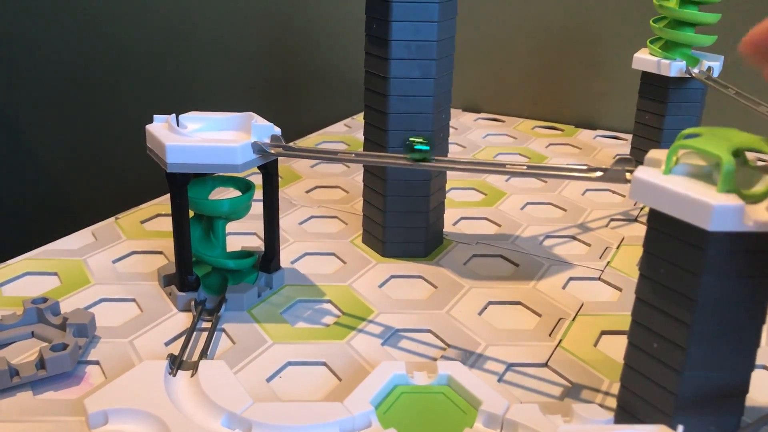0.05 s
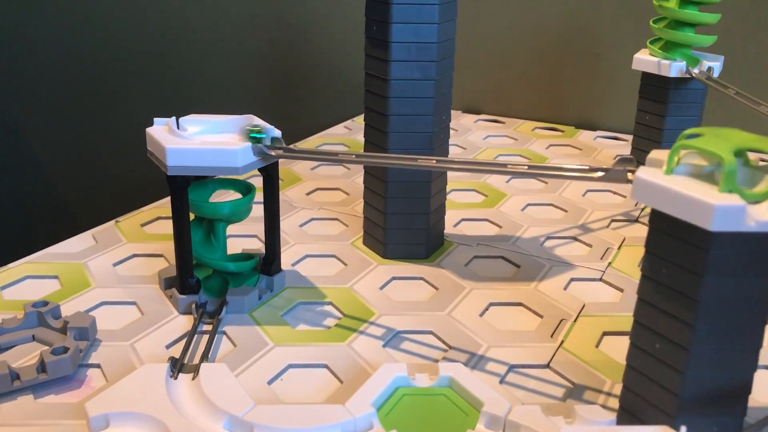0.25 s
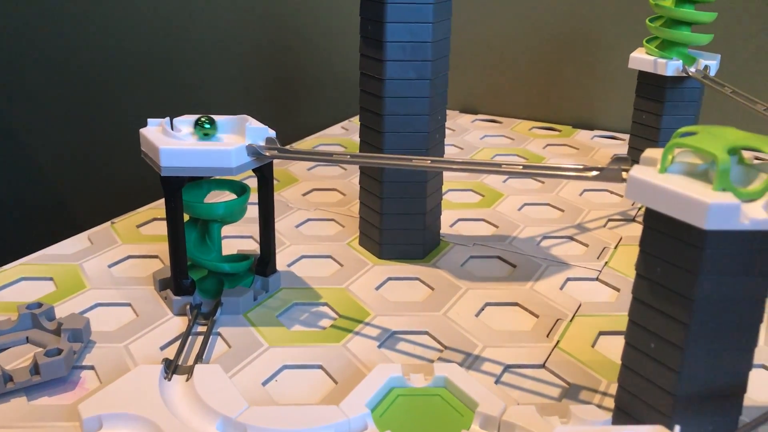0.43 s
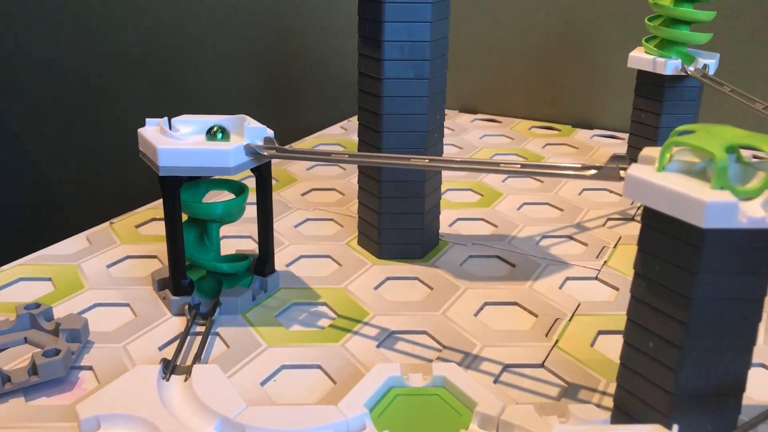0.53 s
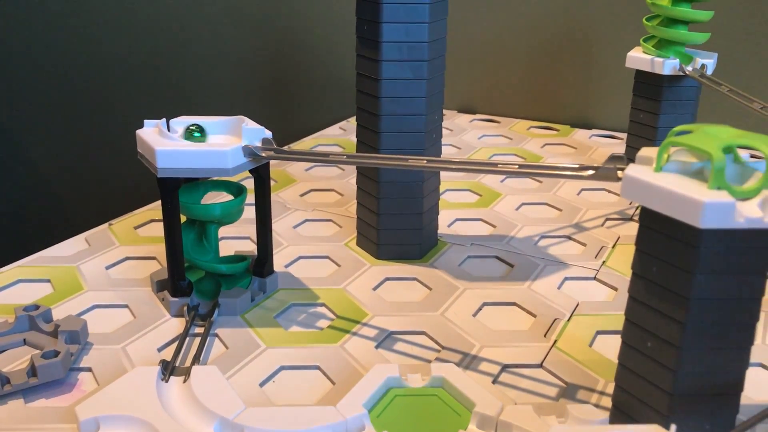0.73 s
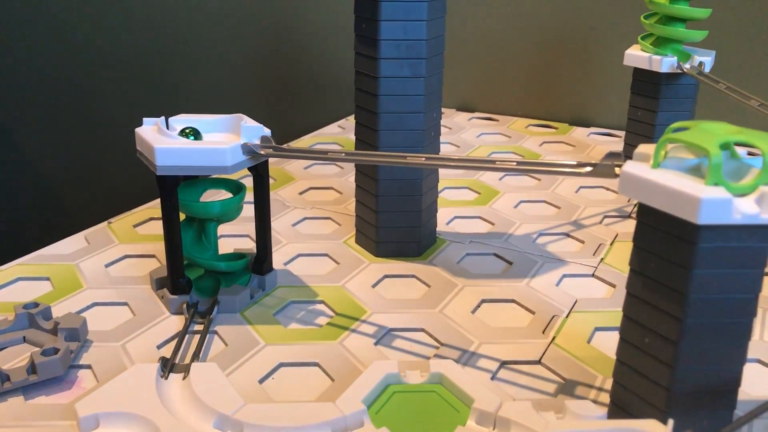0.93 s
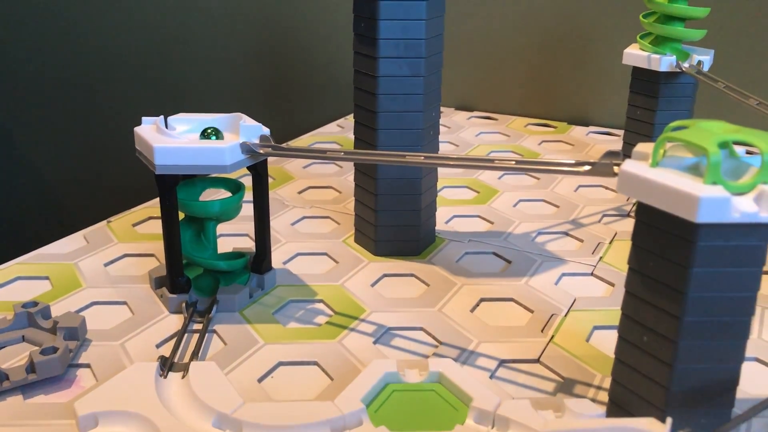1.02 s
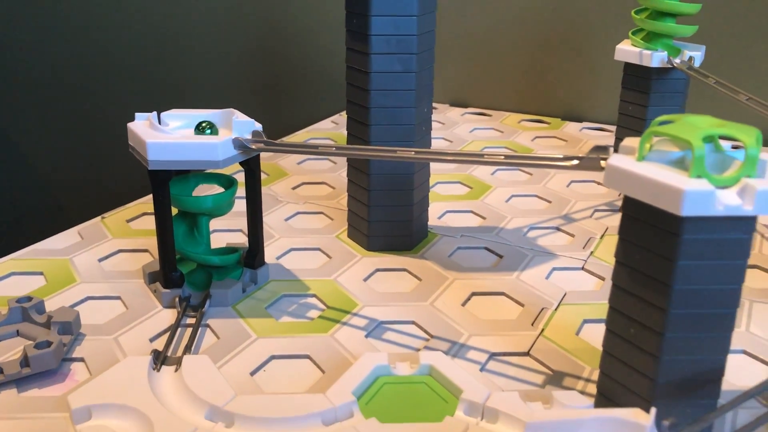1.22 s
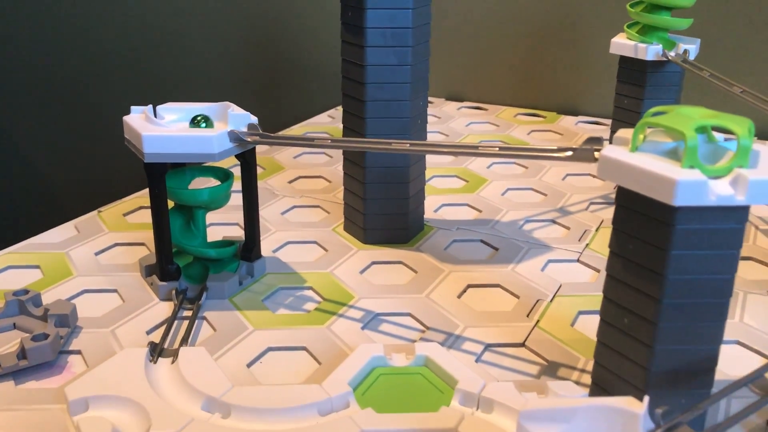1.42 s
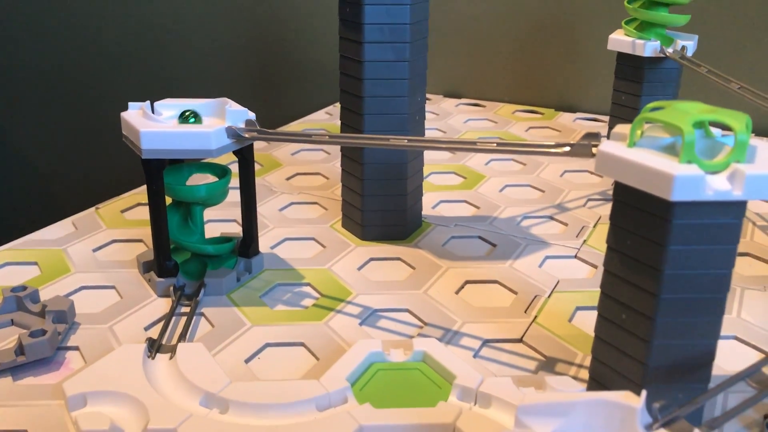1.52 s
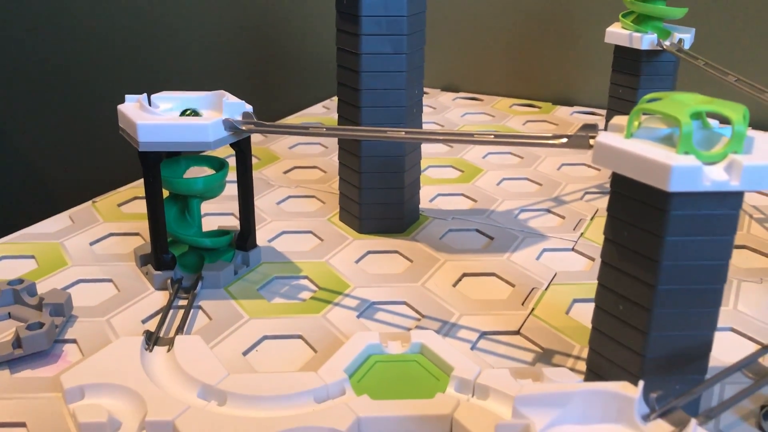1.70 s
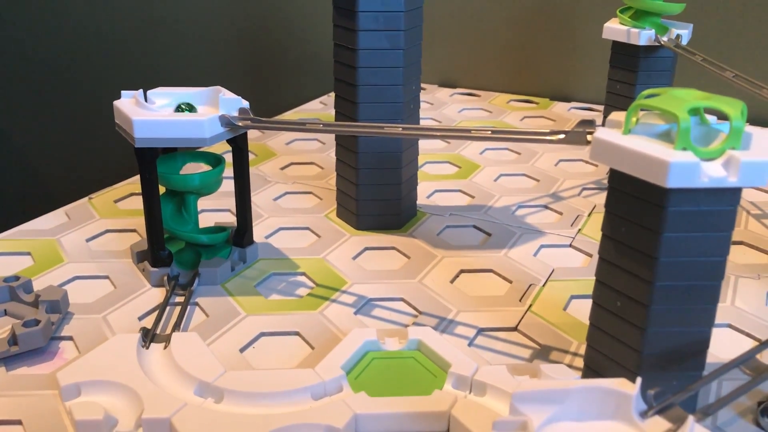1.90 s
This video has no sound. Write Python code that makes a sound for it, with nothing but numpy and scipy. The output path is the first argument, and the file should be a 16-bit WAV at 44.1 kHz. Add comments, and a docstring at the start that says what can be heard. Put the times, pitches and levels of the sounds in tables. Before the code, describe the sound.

A marble rolls along metal rails on a toy marble run, with one dry tap near 0.1 seconds. From 0.2 to 0.5 seconds it clatters into a plastic tray in sharp, glassy knocks while the rails ring. From 0.6 to 2 seconds it circles the dish much more softly, in quickening swells of hollow rumble with brief scrapes. The quiet room has a faint electrical hum.

```python
"""In a quiet room with a faint mains hum, a marble rolls down a pair of metal rails and sets them ringing.
After one dry tap it clatters into the plastic tray of a toy marble run: each knock cracks and rings
the shell with a glassy ping on top, and two landings thud on the tray's floor. The marble then swings
round the dish, each swing sooner than the last, rumbling on the slope, stirring a hollow ring from
the tray and scraping where it is fastest."""
import sys
import numpy as np
from scipy import signal
from scipy.io import wavfile

SR = 44100
rng = np.random.default_rng(int(sys.argv[2]) if len(sys.argv) > 2 else 0)


def store_pcm(level_fs):
    """Save levels as 16-bit WAV."""
    pcm = np.round(np.clip(level_fs, -1, 1) * 32767).astype(np.int16)
    wavfile.write(sys.argv[1], SR, np.atleast_2d(pcm).T)


N = 85995


def amp(db):
    """Decibels to gain."""
    return 10 ** (np.asarray(db) / 20)


def unit(x):
    """Scales to rms 1."""
    return x / np.sqrt(np.mean(x ** 2) + 1e-20)


def curve_at(points, hz):
    """Reads a curve on a log-frequency axis."""
    f, value = np.transpose(points)
    return np.interp(np.log(hz + 1), np.log(f + 1), value)


def fader(points):
    """Gain over time from (time_s, level_db) points, shut after the last."""
    return amp(np.interp(np.arange(N) / SR, *np.transpose(points), right=-140))


def decay(t, t60):
    """Falls 60 dB in t60 seconds."""
    return np.exp(-np.log(1000) * t / t60)


def add(mix, start_s, sound):
    """Mixes a sound in at start_s."""
    part = mix[max(round(start_s * SR), 0):][:len(sound)]
    part += sound[:len(part)]


def body(eq, peaks=(), size=4096):
    """Minimum-phase impulse response of an EQ curve with resonant peaks."""
    hz = abs(np.fft.fftfreq(size, 1 / SR))
    gain = amp(curve_at(eq, hz))
    for pitch_hz, width_hz, db in peaks:
        gain *= 1 + (amp(db) - 1) / (1 + (2 * (hz - pitch_hz) / width_hz) ** 2)
    spectrum = np.exp(np.conj(signal.hilbert(np.log(gain))))
    return np.fft.ifft(spectrum).real[:size // 2]


def colour(x, eq, peaks=()):
    """Passes a sound through a body."""
    return signal.fftconvolve(x, body(eq, peaks))[:len(x)]


def noise(eq, peaks=(), size=N):
    """Coloured noise of rms 1."""
    return unit(colour(rng.standard_normal(size), eq, peaks))


def resonate(x, pitch_hz, width_hz):
    """Rings one narrow resonance, scaled to rms 1."""
    return unit(signal.lfilter(*signal.iirpeak(pitch_hz, pitch_hz / width_hz, SR), x))


def grit(per_s=6100, spread_db=3.5):
    """Tiny impacts of the marble on the grain of the surface."""
    sizes = amp(spread_db * np.minimum(rng.exponential(1, N), 4))
    return sizes * rng.choice([-1, 1], N) * (rng.random(N) < per_s / SR)


# Dark bed of room air: freq_hz, gain_db
AIR_EQ = [(20, -18), (40, -2.5), (58, 1.5), (170, -10.5), (400, -10), (2000, -30.5), (9000, -32.5)]
# Mains hum and its octave: pitch_hz, level_db
HUM_TONES = [(60, -76), (120, -73)]

def room_tone(air_db=-69.5):
    """Steady room air and mains hum lie under everything."""
    t = np.arange(N) / SR
    air = amp(air_db) * noise(AIR_EQ)
    hum = sum(amp(db) * np.sqrt(2) * np.sin(2 * np.pi * (hz * t + rng.random())) for hz, db in HUM_TONES)
    return air + hum


# Fader rides for the roll on the rails and for their ring: time_s, level_db
RAIL_ROLL_FADER = [(0, -62), (.18, -56), (.24, -53.5), (.3, -67)]
RAIL_RING_FADER = [(.22, -72), (.28, -40.5), (.47, -45.5), (.53, -57), (.6, -70.5), (.8, -104)]
# Tone of the bassy roll and of the bright ring: freq_hz, gain_db
RAIL_ROLL_EQ = [(30, -13), (90, 3.5), (350, -16), (1150, -6), (1700, -3.5), (2100, -13), (3600, -11.5),
                (8000, -24), (16000, -35.5)]
RAIL_RING_EQ = [(300, -22.5), (1100, -5), (2100, -12), (2650, 0.5), (2950, 1), (3300, -14.5), (7000, -15),
                (9000, -30)]
# Metallic resonances in the ring: pitch_hz, width_hz, boost_db
RAIL_RING_PEAKS = [(2375, 40, 9), (2625, 25, 9)]

def rails():
    """The marble jolts along the rails, which ring on after it has left them."""
    roll = unit(colour(grit(per_s=1100), RAIL_ROLL_EQ))
    ring = noise(RAIL_RING_EQ, RAIL_RING_PEAKS)
    return fader(RAIL_ROLL_FADER) * roll + fader(RAIL_RING_FADER) * ring


# Clicky midrange of the tap: freq_hz, gain_db
TAP_EQ = [(100, -15.5), (800, 4), (1700, 6.5), (2700, -17.5), (3800, 6.5), (5000, -22), (16000, -31.5)]

def tap(start_s=.1272, level_db=-32):
    """One dry tap sounds before the marble reaches the tray."""
    out, t = np.zeros(N), np.arange(SR // 2) / SR
    add(out, start_s, amp(level_db) * noise(TAP_EQ, size=len(t)) * decay(t, t60=.018))
    return out


# Ring of the struck tray: pitch_hz, level_db, t60_s
TRAY_MODES = [(1060, -16, .06), (1157, -14, .09), (1650, -14, .06), (1769, -17, .1), (2043, -17, .12),
              (2187, -17, .13), (2368, -5, .08), (2417, -13, .13), (2625, -22, .27), (4090, -12, .03),
              (4483, -4, .035), (4736, -5, .035), (6200, -5, .035)]
# Bright crack of the shell and low shudder of the base: freq_hz, gain_db
CRACK_EQ = [(300, -27), (700, -9.5), (1200, -4.5), (2200, 0), (3200, -8), (4500, -6), (5200, -9.5),
            (7000, -8), (7700, -15.5), (8700, -12), (12500, -16.5), (15500, -26)]
SHUDDER_EQ = [(25, -20.5), (75, 3), (230, 0), (2000, -77.5)]
# Centres of each knock's low, middle, presence, edge and top bands: freq_hz
KNOCK_BANDS_HZ = (1050, 2200, 4600, 6300, 10000)
# Hits on the plastic, with EQ and ping relative to each hit's level:
# start_s, level_db, low_db, presence_db, edge_db, top_db, ping_db
KNOCK_CUES = [(0.1706, -52.5, 6, 2.5, 4, 2.5, -28), (0.224, -43, 2.5, 0, 4, 12, 3),
              (0.2289, -37.5, -2.5, 2, 7, 14, 7), (0.251, -38.5, 5, -1, 7, 10.5, 2.5),
              (0.2665, -31, -5.5, -5, 0.5, -0.5, -11.5), (.273, -19.5, -5, -1, -5.5, -4.5, -11),
              (0.302, -22.5, 1.5, -9, -4, -5, -21), (0.3501, -18, -7, -3.5, -3.5, -3.5, -29),
              (0.3739, -28, 1, -9, 1, -5, -8), (.408, -30.5, -2.5, -4, -3.5, 2, -4.5),
              (0.4465, -25, -8, -4.5, -2.5, -4.5, -16), (.452, -34, 4, -10, -7, -2, 1)]

def knocks(crack_db=-3.5, snap_db=5, shudder_db=-38.5, rise_cycles=.28):
    """Each knock snaps, cracks the shell, rings the tray's modes and shakes the base."""
    out, t = np.zeros(N), np.arange(SR // 2) / SR
    ring = np.zeros(len(t))
    for k, (hz, db, t60) in enumerate(TRAY_MODES):
        attack = 1 - np.exp(-t * hz / rise_cycles)
        ring += (-1) ** k * amp(db) * attack * decay(t, t60) * np.sin(2 * np.pi * hz * t)
    hardest_db = max(cue[1] for cue in KNOCK_CUES)
    for start_s, db, low_db, presence_db, edge_db, top_db, _ in KNOCK_CUES:
        snap = amp(snap_db + db - hardest_db) * decay(t, t60=.0045)  # harder hits are snappier
        crack = noise(CRACK_EQ, size=len(t)) * (amp(crack_db) * decay(t, t60=.068) + snap)
        eq = list(zip(KNOCK_BANDS_HZ, (low_db, 0, presence_db, edge_db, top_db)))
        clack = colour(crack + ring, eq)
        shudder = amp(shudder_db) * noise(SHUDDER_EQ, size=len(t)) * decay(t, t60=.49)
        add(out, start_s, amp(db) * (clack + shudder))
    return out


def pings(pitch_hz=11280, rise_s=.0015):
    """A brief glassy ping rides on each knock."""
    out, t = np.zeros(N), np.arange(SR // 2) / SR
    envelope = (1 - np.exp(-t / rise_s)) * decay(t, t60=.036)
    ping = envelope * np.sin(2 * np.pi * pitch_hz * t)
    for start_s, db, *_, ping_db in KNOCK_CUES:
        add(out, start_s, amp(db + ping_db) * ping)
    return out


# Landings on the floor of the tray: start_s, peak_db, pitch_hz
THUD_CUES = [(0.3505, -23.5, 1057), (0.411, -31.5, 1134)]

def thuds(rise_s=.03):
    """The floor of the tray answers a landing with a short hollow note."""
    out, t = np.zeros(N), np.arange(SR // 2) / SR
    envelope = (1 - np.exp(-t / rise_s)) ** 2 * decay(t, t60=.03)
    envelope /= envelope.max()
    for start_s, db, hz in THUD_CUES:
        add(out, start_s, amp(db) * envelope * np.sin(2 * np.pi * hz * t))
    return out


# Tone of the marble rolling on plastic: freq_hz, gain_db
RUMBLE_EQ = [(100, -11.5), (380, -22), (600, -2), (740, -10.5), (950, 2.5), (1300, -3.5), (2000, -17),
             (6000, -21), (9000, -34.5)]
# Resonances in that rumble: pitch_hz, width_hz, boost_db
DISH_PEAKS = [(532, 35, 13), (1565, 50, 9), (2405, 65, 14.5)]
# Passes through the dish, singing relative to level: peak_s, level_db, half_length_s, singing_db
SWING_CUES = [(0.592, -57.5, 0.015, 5), (0.82, -54.5, 0.019, 0), (1.022, -56.5, 0.025, -10.5),
              (1.198, -50.5, 0.016, -27), (1.357, -53, 0.018, -13.5), (1.501, -52.5, 0.02, -22.5),
              (1.626, -55.5, 0.026, -7), (1.741, -54.5, 0.017, -6.5), (1.852, -56, 0.025, -7),
              (1.95, -60.5, 0.021, 0)]

def swings(bed_db=-79.5):
    """The rumble swells each time the marble speeds through the dish, and the dish sings along."""
    t = np.arange(N) / SR
    rumble_power = amp(bed_db) ** 2 * (t > KNOCK_CUES[-1][0])  # faint steady roll after the last knock
    singing_power = np.zeros(N)
    for peak_s, db, half_s, singing_db in SWING_CUES:
        swell = amp(db) / np.cosh((t - peak_s) / half_s)
        rumble_power += swell ** 2
        singing_power += (swell * amp(singing_db)) ** 2
    rumble = unit(colour(grit(), RUMBLE_EQ, DISH_PEAKS))
    singing = resonate(grit(), pitch_hz=1255, width_hz=55)
    return np.sqrt(rumble_power) * rumble + np.sqrt(singing_power) * singing


# Lowest modes of the tray under the rolling marble: pitch_hz, level_db
HOLLOW_MODES = [(390, -74.5), (521, -74)]

def hollow_ring():
    """Each swing stirs the tray's lowest modes, which ring on into the next."""
    t = np.arange(N) / SR
    push = sum(amp(db) / np.cosh((t - peak_s) / half_s) for peak_s, db, half_s, _ in SWING_CUES)
    return sum(amp(db) * resonate(grit() * push, hz, width_hz=10) for hz, db in HOLLOW_MODES)


# Tone of the scraped tray: freq_hz, gain_db
SCRAPE_EQ = [(100, -16.5), (500, -9), (1100, 10), (2000, 1), (6500, -6.5), (8000, -15), (13000, -15.5),
             (16000, -19)]
# Sharp resonances in the scrape: pitch_hz, width_hz, boost_db
SCRAPE_RESONANCES = [(2420, 110, 10), (4620, 240, 15), (5760, 140, 14)]
# Scrapes at the fastest part of a swing: peak_s, level_db, half_length_s, low_db
SCRAPE_CUES = [(0.811, -59.5, 0.013, 5.5), (1.01, -62.5, 0.016, 4), (1.162, -66.5, 0.0027, 9),
               (1.198, -57, 0.0085, -1), (1.351, -52, 0.0047, 3), (1.497, -51, 0.0065, -1.5),
               (1.611, -58, 0.0039, 14), (1.627, -50.5, 0.0032, -3), (1.7272, -55, 0.0021, 13),
               (1.755, -52, 0.0033, 7.5), (1.823, -55.5, 0.0032, -13), (1.866, -53.5, 0.0055, 6.5),
               (1.936, -60, 0.0065, 5)]

def scrapes():
    """Short bursts of chatter ring the tray where the marble presses hardest."""
    out, t = np.zeros(N), np.arange(N) / SR
    chatter = unit(grit(per_s=1800))
    for peak_s, db, half_s, low_db in SCRAPE_CUES:
        burst = amp(db) * np.exp(-.5 * ((t - peak_s) / half_s) ** 2) * chatter
        low_shelf = [(KNOCK_BANDS_HZ[0], low_db), (KNOCK_BANDS_HZ[1], 0)]
        out += colour(burst, low_shelf)
    tray = body(SCRAPE_EQ, SCRAPE_RESONANCES)
    return signal.fftconvolve(out, tray / np.linalg.norm(tray))[:N]


# Reverb time of the room: freq_hz, t60_s
REVERB_TIMES = [(200, 0.76), (15000, 0.32)]

def reverb(send):
    """Sparse reflections off the room, the treble dying first."""
    reflections = rng.choice([-1., 1.], SR) * (rng.random(SR) < .1)
    reflections[:220] = 0  # 5 ms pre-delay
    hz, t, bands = signal.stft(reflections, SR, nperseg=256)
    bands = bands * decay(t, curve_at(REVERB_TIMES, hz)[:, None])
    tail = signal.istft(bands, SR, nperseg=256)[1]
    return signal.fftconvolve(send, tail / np.linalg.norm(tail))[:N]


def scene():
    """Hits and rolling feed the reverb; room tone, pings, thuds and the hollow ring stay dry."""
    hits = knocks() + tap()
    rolling = rails() + swings() + scrapes()
    wet = reverb(amp(-15) * hits + amp(-11.5) * rolling)
    return (room_tone() + hits + rolling + wet + pings() + thuds() + hollow_ring())[None]


def record(dry, cutoff_hz=16100):
    """A steep low-pass trims the very top of the mix."""
    low_pass = signal.firwin(401, cutoff_hz, window=("kaiser", 8), fs=SR)
    return signal.oaconvolve(dry, low_pass[None], "same")


dry = scene()
out = record(dry)
store_pcm(out)
```